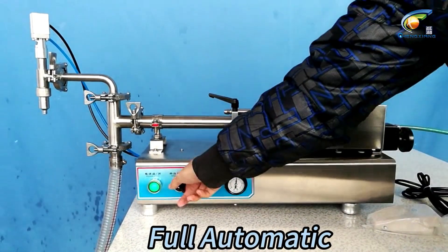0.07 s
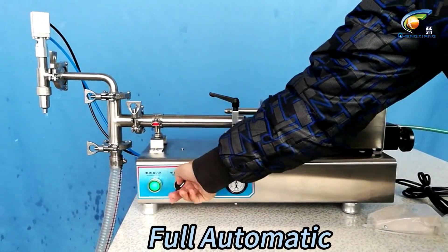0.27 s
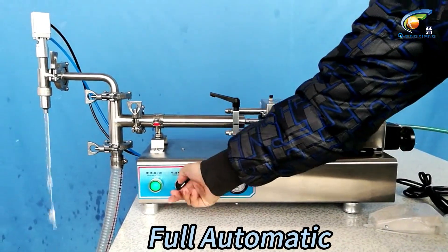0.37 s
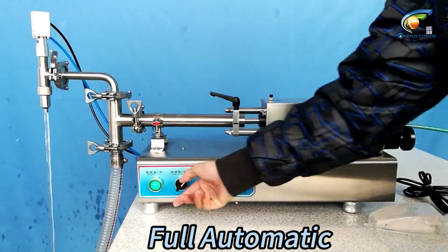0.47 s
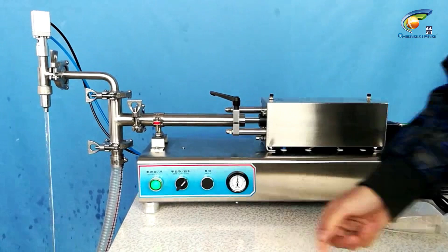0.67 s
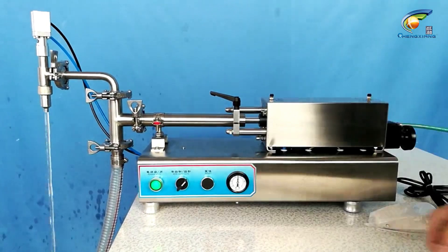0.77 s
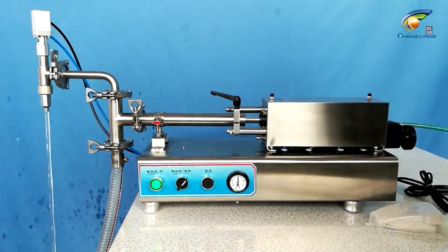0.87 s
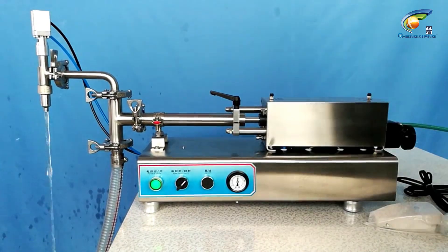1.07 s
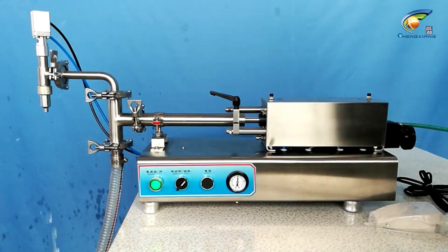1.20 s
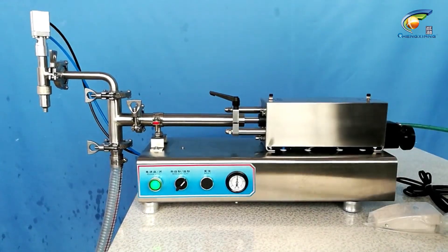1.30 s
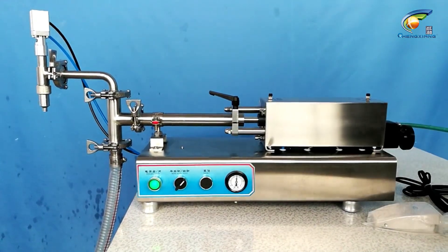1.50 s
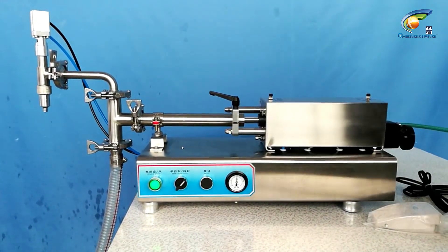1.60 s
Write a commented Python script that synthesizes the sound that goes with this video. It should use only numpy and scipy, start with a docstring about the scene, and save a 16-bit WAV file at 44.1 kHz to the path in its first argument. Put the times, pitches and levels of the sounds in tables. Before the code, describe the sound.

A pneumatic filling machine lets out a sharp air blast with a thump and metal clack, hisses steadily, then repeats on the return stroke. A thin stream of liquid gurgles faintly underneath, heard close up in a small room.

```python
"""A pneumatic piston filler makes one stroke out and one back, on a bench in a small room.
The stereo microphones stand close by, the right one facing the exhaust. At each reversal the valve
dumps a blast of air, the piston thumps and metal clacks on the frame; then the exhaust hisses on
through the ringing steel housing. Underneath, a thin stream of liquid gurgles faintly, the nozzle
ticks shut, and an idle whine fades into the room tone."""
import sys
import numpy as np
from scipy import signal
from scipy.fft import rfft, irfft
from scipy.io import wavfile
from scipy.ndimage import uniform_filter1d

SR = 44100
rng = np.random.default_rng(int(sys.argv[2]) if len(sys.argv) > 2 else 0)


def output_pcm(signal):
    """Save a mono or channel-first signal as 16-bit PCM at the path in sys.argv[1].

    Samples are clipped to [-1, 1] before scaling.
    """
    pcm = np.clip(np.atleast_2d(signal).T, -1, 1) * 32767
    wavfile.write(sys.argv[1], SR, np.round(pcm).astype(np.int16))


N = 72765
T = np.arange(N) / SR
HZ = np.fft.rfftfreq(N, 1 / SR)

# reverberation of the small room: f/Hz, t60/s
ROOM_DECAY = [(100, 0.93), (250, 0.42), (400, 0.42), (2000, 0.47), (6000, 0.89), (14000, 0.25)]
# colour of the room tone: f/Hz, relative level/dB
ROOM_TONE_COLOUR = [(25, -92.5), (60, -95.5), (170, -99), (350, -105), (750, -101), (1500, -102),
                    (2000, -106), (3000, -106), (5000, -114), (9000, -119), (14000, -129)]
# room tone at the left microphone against the right: f/Hz, level/dB
ROOM_TONE_SHADE = [(3000, -2.5), (5000, -8), (9000, -17)]
# whine of the idle machine: f/Hz, left level/dB, right level/dB
WHINE = [(541.5, -75.5, -81), (1615, -91, -82)]
# colour of the vessel that takes the stream: f/Hz, relative level/dB
VESSEL_COLOUR = [(180, -12), (240, 1), (320, -5.5), (450, -1), (600, -7), (850, 6), (1000, -0.5)]
# splashing of the stream: t/s, level/dB
SPLASHING = [(.3, -52.5), (.46, -67), (.55, -68.5), (.62, -60.5), (.79, -65.5), (.84, -56), (.92, -67),
             (1.0, -60), (1.22, -58.5), (1.38, -61.5), (1.52, -100)]
# larger gulps of liquid: t/s, starting f/Hz, level/dB
LIQUID_GULPS = [(.59, 194, -47), (.823, 220, -43), (.838, 742, -42), (.972, 816, -42), (1.01, 214, -45)]
# modes of the steel frame: f/Hz, relative level/dB, t60/s
FRAME_MODES = [(257.6, -24, 0.19), (486, -29.5, 0.11), (908, -28.5, 0.062), (1014, -26, 0.029),
               (1470, -26, 0.023), (1628, -19.5, 0.016), (1907, -21.5, 0.092), (2253, -26.5, 0.076),
               (2480, -19.5, 0.033)]
# clacks of the piston rod and valve: t/s, gain/dB, favoured f/Hz
METAL_CLACKS = [(0.2545, -0.5, 854), (0.2681, -1.5, 2720), (0.3096, -7.5, 905), (1.0942, 0.5, 1510),
                (1.126, -17, 1450), (1.137, -8.5, 920)]
# piston thumps and their rebounds: t/s, level/dB
PISTON_THUMPS = [(0.238, -40), (0.2535, -20), (0.2845, -37), (1.0934, -21.8), (1.1255, -38), (1.143, -40)]
# resonances of the housing: f/Hz, width/Hz, lift going out/dB, lift coming back/dB
HOUSING_RESONANCES = [(1275.5, 85, 10.5, 5), (1479, 157, 9.5, 11.5), (2127, 176, 10, 7.5),
                      (2293, 290, 2, 6.5), (2566, 293, 4, 6.5), (2777, 163, 10.5, 12), (3865, 360, 7, 3.5),
                      (4380, 585, 9, 10.5), (5378, 660, 12.5, 11), (6230, 345, 8, 9),
                      (9270, 1170, 8.5, 8.5), (11560, 910, 6, 5.5)]
# exhaust blasts: peak t/s, level/dB, rise/(dB/s), fall/(dB/s), tilt/(dB/octave)
AIR_BLASTS = [(0.2591, -16, 856, 449, -0.28), (1.1004, -19.5, 1250, 557, -0.2)]
# exhaust flow on the stroke out and the stroke back: t/s, level/dB
OUT_FLOW = [(.25, -30.5), (.34, -37), (.53, -38), (.62, -37), (.88, -36.5), (.98, -36.5), (1.02, -42.5),
            (1.06, -43), (1.09, -37.5)]
BACK_FLOW = [(1.09, -28), (1.17, -36.5), (1.38, -38), (1.57, -38.5), (1.65, -39)]
# broad colour of the air jet in a blast and on each stroke: f/Hz, relative level/dB
BLAST_JET = [(30, 5), (110, -2), (250, 3.5), (380, -1), (500, 3), (750, -4), (1000, 0), (1500, -2.5),
             (2600, -4), (4600, -1.5), (7300, -0.5), (9500, 0.5), (13500, 4.5), (15500, -1.5)]
OUT_JET = [(100, -39), (300, -9), (600, -17), (830, -3), (1150, -7), (1700, 0.5), (3200, 1.5), (5500, -6),
           (7200, -3), (9500, -5), (12300, -4), (15000, -13)]
BACK_JET = [(300, -47), (620, -36), (900, -13.5), (1150, -5), (1700, -1), (3300, -1.5), (5500, -2.5),
            (7200, -1.5), (9500, -8), (12300, 0.5), (15000, -6.5)]
# the same jets at the left microphone against the right: f/Hz, level/dB
BLAST_SHADE = [(200, -4.5), (600, -17), (1400, -6.5), (2500, -3), (3400, 2), (4500, -22), (5600, -10.5),
               (7500, -25), (12000, -23), (14500, -18)]
OUT_SHADE = [(250, -6), (800, -18), (1350, -1), (2200, -9), (2800, -7), (3300, -6.5), (4400, -4.5),
             (5000, -6), (5500, -18), (7500, -22), (12000, -24), (14500, -12)]
BACK_SHADE = [(250, -3), (800, -10), (1400, -5), (2300, -10.5), (2800, -7), (3400, -1.5), (4400, -14.5),
              (5500, -14), (7500, -25), (12000, -25.5), (14500, -17)]


def amp(db):
    """Decibels to gain."""
    return 10 ** (np.asarray(db) / 20)


def unit_rms(x):
    """Scales to rms 1."""
    return x / np.sqrt(np.mean(x ** 2) + 1e-20)


def curve_at(points, hz=HZ):
    """Reads a curve on a log-frequency axis."""
    f, value = np.transpose(points)
    return np.interp(np.log(hz + 1), np.log(f), value)


def envelope(points):
    """Gain over time from a dB curve, silent before it starts."""
    s, db = np.transpose(points)
    return amp(np.interp(T, s, db)) * (T > s[0])


def decay(t, t60):
    """Exponential decay by 60 dB in t60."""
    return np.exp(-np.log(1000) * t / t60)


def add(mix, s, sound):
    """Mixes a sound in at s seconds."""
    part = mix[round(s * SR):][:len(sound)]
    part += sound[:len(part)]


def stereo_noise(gain, shade, mono_hz=200):
    """Coloured noise: rms 1 at the right microphone, shaded at the left, alike at both in the bass."""
    apart, facing = rfft(rng.standard_normal((2, N))) * gain
    shared = 1 / (1 + (HZ / mono_hz) ** 2)
    left = irfft((shared * facing + np.sqrt(1 - shared ** 2) * apart) * amp(curve_at(shade)), N)
    right = irfft(facing, N)
    return np.array([left, right]) / right.std()


def in_room(dry, reverb_db):
    """The direct sound plus sparse reflections off the walls, each band dying at its own speed."""
    gap = 20  # mean samples between reflections
    slots = np.arange(10 * gap, SR, gap)[:-1]
    arrivals = slots + rng.integers(0, gap, (2, len(slots)))
    taps = np.zeros((2, SR))
    np.put_along_axis(taps, arrivals, rng.choice([-1., 1.], arrivals.shape), 1)
    hz, t, bands = signal.stft(taps, SR, nperseg=256)
    tail = signal.istft(bands * amp(-60 * t / curve_at(ROOM_DECAY, hz)[:, None]), SR, nperseg=256)[1]
    reverb = signal.fftconvolve(np.atleast_2d(dry), tail / np.linalg.norm(tail[0]), axes=1)[:, :N]
    return dry + amp(reverb_db) * reverb


def room_tone(air_db=-66.5, fade_s=0.32):
    """Quiet air all round, and a faint whine that dies away once the machine has started."""
    whine = sum(amp([[left], [right]]) * np.sqrt(2) * np.sin(2 * np.pi * hz * T)
                for hz, left, right in WHINE)
    idle = np.clip(1 - (T - AIR_BLASTS[0][0]) / fade_s, 0, 1)
    return amp(air_db) * stereo_noise(amp(curve_at(ROOM_TONE_COLOUR)), ROOM_TONE_SHADE) + whine * idle


def bubble_tone(hz, t, glide_per_s=1.44):
    """A ringing bubble, its pitch gliding up from hz."""
    return np.sin(2 * np.pi * hz * t * (1 + glide_per_s * t / 2))


def liquid(bubbles_per_s=1100, decay_cycles=4.7, gulp_rise_s=0.0069):
    """Midway between the microphones, the stream stirs up many small bubbles and a few larger gulps."""
    t = T[:SR // 5]
    wash, gulps = np.zeros(N), np.zeros(N)
    pitches_hz = np.geomspace(184.8, 974, num=24)
    for hz in pitches_hz:
        births = (rng.random(N) < bubbles_per_s / len(pitches_hz) / SR) * rng.standard_normal(N)
        bubble = (1 - np.exp(-t * hz)) * np.exp(-t * hz / decay_cycles) * bubble_tone(hz, t)
        wash += amp(curve_at(VESSEL_COLOUR, hz)) * signal.fftconvolve(births, bubble)[:N]
    for s, hz, db in LIQUID_GULPS:
        swell = (1 - np.exp(-t / gulp_rise_s)) * decay(t, t60=0.075)
        add(gulps, s, amp(db) * swell * bubble_tone(hz, t))
    return in_room(unit_rms(wash) * envelope(SPLASHING) + gulps, reverb_db=-3)


def nozzle(shut_s=1.0235, peak_db=-36.5, decay_s=0.0009, centre_hz=8700, half_width_hz=2600):
    """One small soft tick on the right as the nozzle shuts."""
    age = np.maximum(T - shut_s, 0) / decay_s
    snap = stereo_noise(1 / (1 + ((HZ - centre_hz) / half_width_hz) ** 2), BLAST_SHADE)
    return amp(peak_db) * snap * age * np.exp(1 - age)


def clamp_chatter(hits_per_s=490, gain_db=-25, peak_delay_s=0.035):
    """Loose clamps tap the frame, hardest just after each blast."""
    shaking = T / peak_delay_s * np.exp(-(T / peak_delay_s) ** 2 / 2)
    chatter = np.zeros(N)
    for s, *_ in AIR_BLASTS:
        hits = rng.choice([-1., 1.], N) * (rng.random(N) < hits_per_s / SR)
        add(chatter, s, amp(gain_db) * shaking * hits)
    return chatter


def frame(spread_octaves=0.26, crack_db=-33.5, left_db=-9):
    """The steel frame rings to the right: clamps stir all its modes, a clack those near its pitch."""
    modes = np.array([amp(db) * decay(T, t60) * np.sin(2 * np.pi * hz * T)
                      for hz, db, t60 in FRAME_MODES])
    mode_hz = np.transpose(FRAME_MODES)[0]
    metal = signal.fftconvolve(clamp_chatter(), modes.sum(0))[:N]
    for s, db, hz in METAL_CLACKS:
        nearness = 1 / (1 + (np.log2(mode_hz / hz) / spread_octaves) ** 2)
        crack = amp(crack_db) * rng.standard_normal(N) * decay(T, t60=0.036)
        add(metal, s, amp(db) * (nearness @ modes + crack))
    return in_room(metal * amp([[left_db], [0]]), reverb_db=-5)


def piston(length_s=0.0135, start_hz=200, rise_hz_per_s=4500, octave_share=0.089, one_way_push=0.06):
    """Each reversal shoves the bench for a few cycles; the bench rocks back more weakly."""
    t = np.arange(0, length_s, 1 / SR)
    phase = 2 * np.pi * (start_hz + rise_hz_per_s * t / 2) * t
    swing = np.sin(phase) - octave_share * np.cos(2 * phase) - one_way_push
    shove = np.sin(np.pi * t / length_s) * swing
    thumps = np.zeros(N)
    for s, db in PISTON_THUMPS:
        add(thumps, s, amp(db) * shove)
    return in_room(thumps, reverb_db=-13.5)


def housing(echo_db=-7):
    """The steel housing colours the air: a fine ripple from inner echoes, and resonances per stroke."""
    echoes = rng.standard_normal((2, N)) * decay(T, t60=0.12)
    ripple = abs(1 + amp(echo_db) * rfft(echoes / np.linalg.norm(echoes[0])))
    lifts_db = np.zeros((2, len(HZ)))
    for hz, width, out, back in HOUSING_RESONANCES:
        lifts_db += np.outer([out, back], 1 / (1 + (2 * (HZ - hz) / width) ** 4))
    return ripple, lifts_db


def turbulence(hiss, depth_db=1.8):
    """Turbulence lets each narrow band of the hiss swell and sink by itself."""
    bands = signal.stft(hiss, nperseg=1024, noverlap=768)[2]
    patches = rng.standard_normal(bands.shape[1:])
    for _ in range(2):  # smooth across frequency and time
        patches = uniform_filter1d(uniform_filter1d(patches, size=3, axis=0), size=7, axis=1)
    return signal.istft(bands * amp(depth_db * unit_rms(patches)), nperseg=1024, noverlap=768)[1][:, :N]


def stroke_hiss(flow, gain, shade, full_flow_db=-30, dull_hz=7100, dulling_db_per_db=0.42):
    """Air hisses out while the piston travels; a weaker flow loses its treble first."""
    jet = turbulence(stereo_noise(gain, shade))
    body = irfft(rfft(jet) / (1 + (HZ / dull_hz) ** 6), N)
    treble_share = np.minimum(flow / amp(full_flow_db), 1) ** dulling_db_per_db
    return flow * (body + (jet - body) * treble_share)


def air_blasts(ripple, lifts_db, lift_share=0.7, swell_s=0.035, fade_in_s=0.016):
    """At each reversal a blast of air swells quickly to its peak and dies away."""
    blasts = np.zeros((2, N))
    for (s, db, rise, fall, tilt), lift_db in zip(AIR_BLASTS, lifts_db):
        colour_db = curve_at(BLAST_JET) + lift_share * lift_db + tilt * np.log2(HZ + 1)
        fade_in = np.clip((T - s + swell_s) / fade_in_s, 0, 1)
        burst = amp(db - np.maximum(rise * (s - T), fall * (T - s)))
        blasts += stereo_noise(ripple * amp(colour_db), BLAST_SHADE) * fade_in * burst
    return blasts


def exhaust():
    """Blasts and hiss leave through the housing, close to the right microphone."""
    ripple, lifts_db = housing()
    air = air_blasts(ripple, lifts_db)
    out_flow = envelope(OUT_FLOW) * (T < AIR_BLASTS[1][0])  # ends at the second blast
    air += stroke_hiss(out_flow, ripple * amp(curve_at(OUT_JET) + lifts_db[0]), OUT_SHADE)
    air += stroke_hiss(envelope(BACK_FLOW), ripple * amp(curve_at(BACK_JET) + lifts_db[1]), BACK_SHADE)
    return in_room(air, reverb_db=-19)


def scene():
    """The machine, the liquid and the room as they reach the microphones."""
    return exhaust() + piston() + frame() + nozzle() + liquid() + room_tone()


def record(dry):
    """The recorder's band limit, at 15.5 kHz."""
    lowpass = signal.firwin(511, 15500, window=("kaiser", 9), fs=SR)
    return signal.oaconvolve(dry, lowpass[None], "same")


dry = scene()
out = record(dry)
output_pcm(out)
```